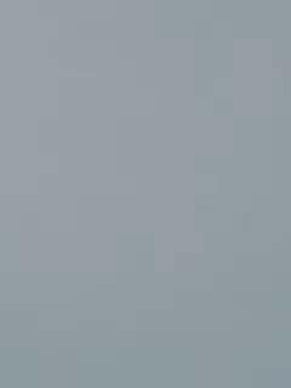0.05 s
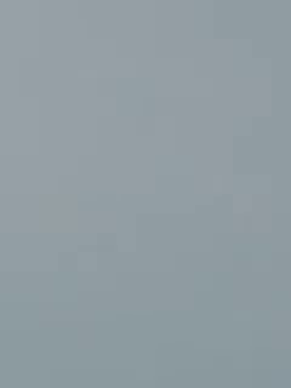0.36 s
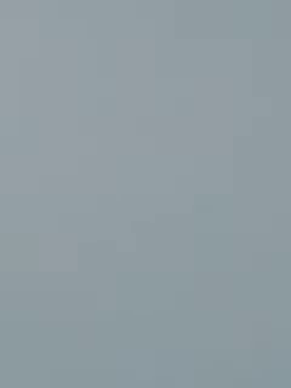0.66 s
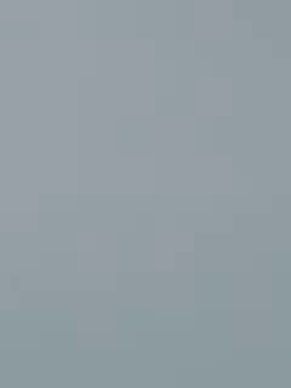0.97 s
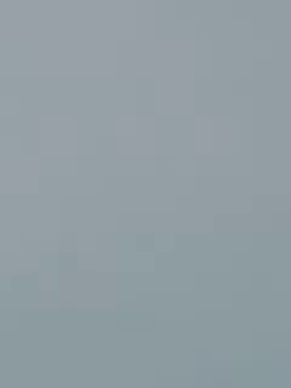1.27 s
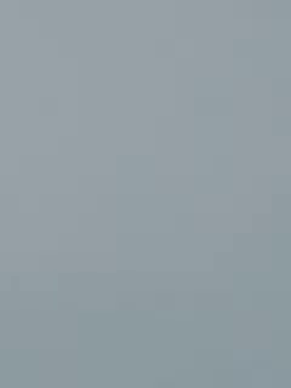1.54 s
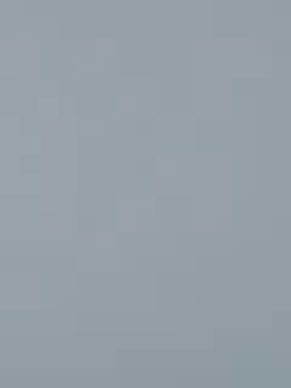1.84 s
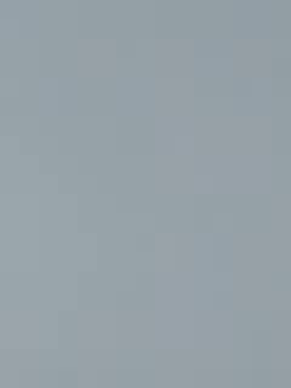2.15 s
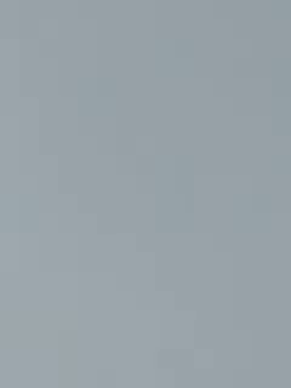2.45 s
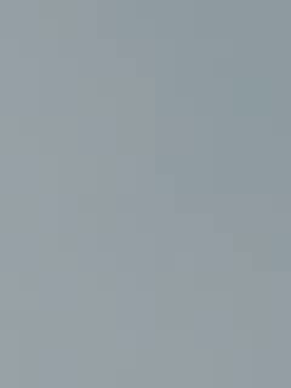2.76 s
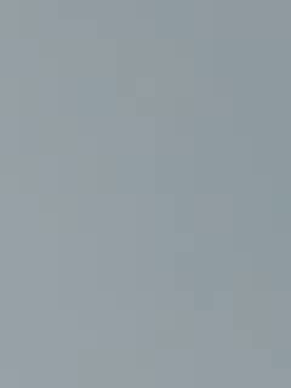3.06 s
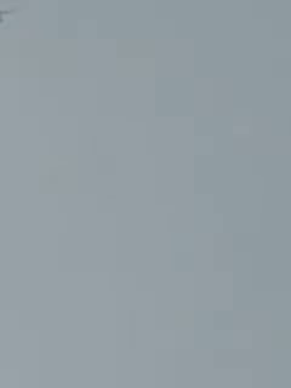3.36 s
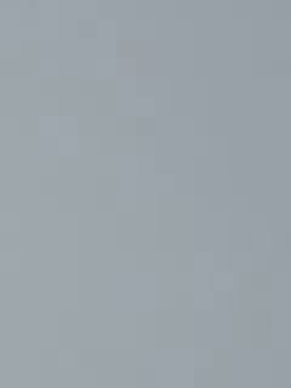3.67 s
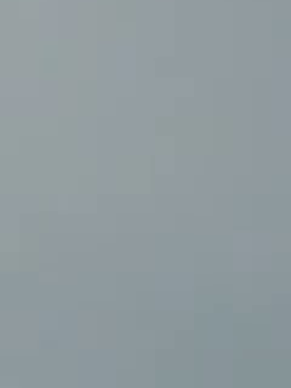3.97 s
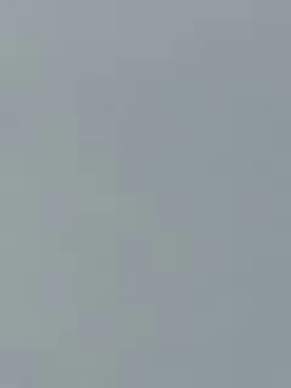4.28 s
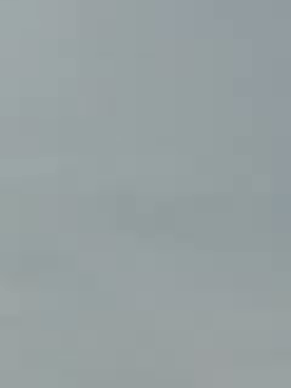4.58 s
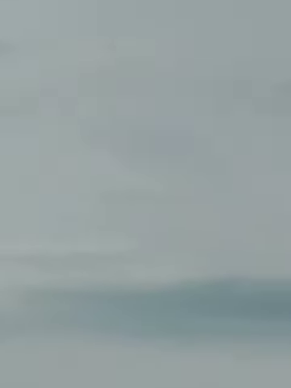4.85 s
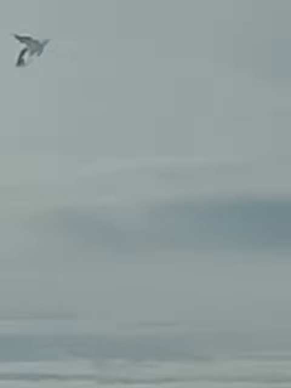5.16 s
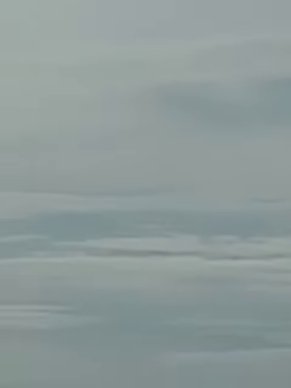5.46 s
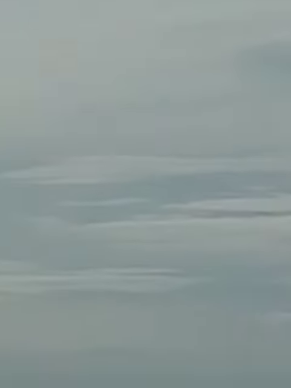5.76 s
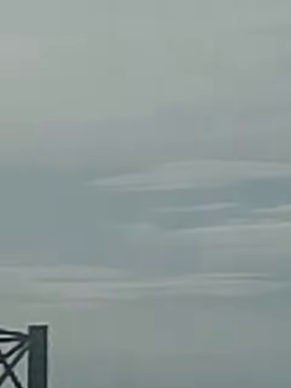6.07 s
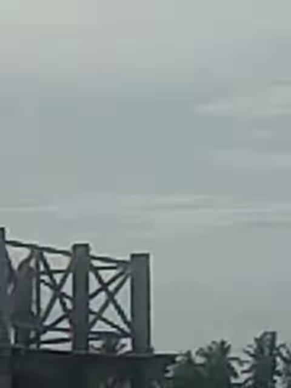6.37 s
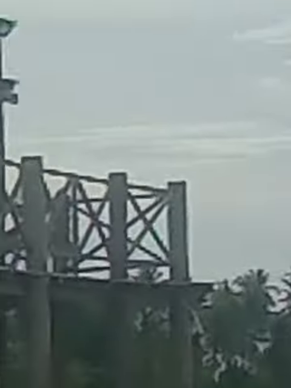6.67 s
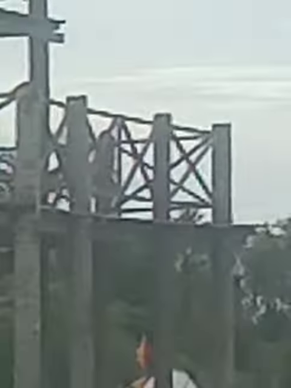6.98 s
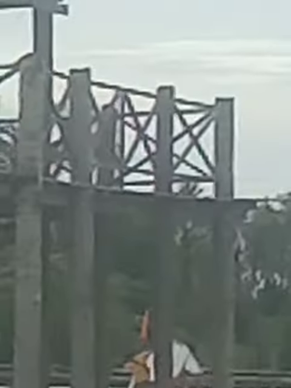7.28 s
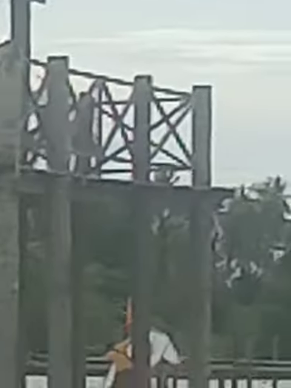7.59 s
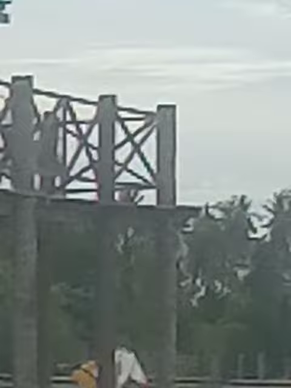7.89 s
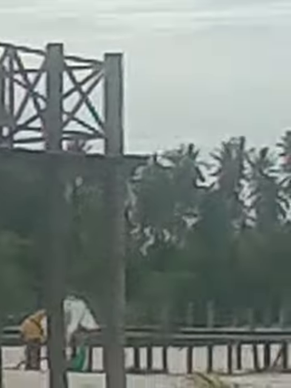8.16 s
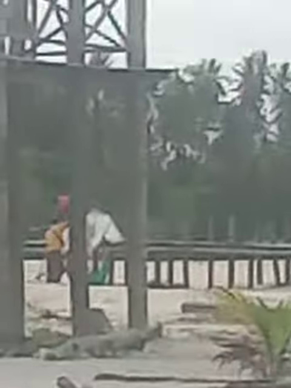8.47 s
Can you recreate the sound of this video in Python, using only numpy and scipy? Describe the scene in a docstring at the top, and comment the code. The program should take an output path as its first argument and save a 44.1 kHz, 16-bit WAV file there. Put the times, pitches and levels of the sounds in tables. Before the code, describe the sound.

A humming kite drones outdoors with a rapid flutter, a faint rasp and a narrow whistle, over the smooth wash of distant surf. Low wind rumble comes and goes on the microphone as the hum swells to its strongest. Then much louder gusts strike in clusters of thumps, briefly pushing down everything else. The hum almost vanishes, returning slightly higher for the last second amid more wind.

```python
"""A humming kite on a beach

The tight ribbon on a kite's bow flutters in the wind and drones, about 28 bursts a second.
The sea hisses behind it, and a hand squeaks faintly on the microphone's casing. Gusts rumble on the
microphone and grow into hard thumps, which make a limiter turn everything down for a moment."""
import sys
import numpy as np
from scipy import signal
from scipy.io import wavfile
from scipy.ndimage import uniform_filter1d, map_coordinates

SR = 44100
rng = np.random.default_rng(int(sys.argv[2]) if len(sys.argv) > 2 else 0)


def output_pcm(signal):
    """Save a mono or channel-first signal as 16-bit PCM at the path in sys.argv[1].

    Samples are clipped to [-1, 1] before scaling.
    """
    pcm = np.clip(np.atleast_2d(signal).T, -1, 1) * 32767
    wavfile.write(sys.argv[1], SR, np.round(pcm).astype(np.int16))


N = 376173
TIME = np.arange(N) / SR

# How fast the ribbon flutters; a pass is one swing. Each row: time in seconds, passes per second.
FLUTTER = [(0, 33.7), (.2, 30.0), (.4, 28.45), (.9, 28.98), (1.8, 28.54), (3.3, 28.05), (4.1, 28.1),
           (4.6, 28.35), (6.8, 28.04), (7.71, 29.3), (8.12, 29.4), (8.25, 32.3), (8.53, 32)]
# Uneven swings. Each row: time in seconds, dB added to the forward swing and taken off the return.
LOPSIDED = [(.6, 0), (1.1, 0.4), (1.7, -0.8), (2.3, -2), (3.3, -0.3), (3.9, -1.44), (4.3, -2), (7.7, 2.5)]
# The ribbon's hum. Each row: time in seconds, pitch at the height of a pass in Hz, level in dB.
HUM = [(0, 757, -44), (.4, 803, -42), (.85, 865, -38.5), (1.15, 793, -40), (1.5, 815, -42.5),
       (2.05, 881, -42), (2.35, 880, -39.5), (2.8, 896, -44.5), (3.45, 950, -52), (3.9, 943, -35.5),
       (4.15, 885, -44), (4.5, 900, -49), (5.1, 907, -45.5), (5.5, 813, -68), (7.55, 906, -61.5),
       (7.72, 1019, -44.5), (8.1, 964, -51.5), (8.53, 878, -48)]
# The ribbon's higher sounds. Each row: time in seconds, overtone level in dB, rasp level in dB.
UPPER_VOICE = [(0, -59, -69), (.7, -60, -71), (1.0, -55, -55.5), (1.35, -56.5, -66), (1.7, -51.5, -75),
               (2.3, -52, -64), (2.8, -57, -69), (3.6, -54, -62), (3.92, -43, -54.5), (4.2, -59, -60.5),
               (4.7, -56, -62.5), (6.5, -81.5, -81), (7.9, -62.5, -57.5), (8.5, -66.5, -66)]
# The bow's narrow whistle. Each row: time in seconds, level in dB, pitch in Hz.
WHISTLE = [(1.9, -53.5, 1263), (2.4, -44, 1233), (3.1, -45, 1270), (3.6, -47, 1318), (4.6, -53.5, 1270),
           (6.8, -53.5, 1244), (8.53, -46.5, 1260)]
# A broad ring below the hum, lasting between passes. Each row: time in seconds, level in dB, pitch in Hz.
GROWL = [(0, -38, 590), (.3, -43, 620), (1.3, -45, 720), (2.0, -50, 720), (3.4, -44.5, 700),
         (3.9, -36.5, 745), (4.3, -38.5, 745), (4.8, -47.5, 750), (5.5, -65.5, 720), (7.4, -56.5, 700),
         (8.0, -46.5, 700), (8.4, -41.5, 710)]
# A thin ring when the wind pulls hardest. Each row: time in seconds, level in dB, pitch in Hz.
SINGING = [(3.5, -75, 946), (3.9, -49, 956), (4.4, -51.5, 939), (4.9, -76, 900)]
# Echoes from the ground and timber frames. Each row: delay in seconds, level in dB.
ECHOES = [(.00633, -20.5), (.015, -12.5), (.047, -19)]
# The tone colour of the sea. Each row: frequency in Hz, relative level in dB.
SEA_SPECTRUM = [(100, -17.5), (400, 1), (900, 0.5), (1170, 7), (1550, 0.5), (2000, 1.5), (2700, -4.5),
                (3400, -20.5), (4300, -22), (5500, -32.5), (7000, -33.5), (12000, -45.5), (15000, -44.5)]
# The slow swell of the sea. Each row: time in seconds, level in dB.
SWELL = [(0, -43), (1.1, -44), (1.6, -46.5), (2.5, -45.5), (3.3, -43), (4.3, -44), (5.1, -46), (5.8, -49.5),
         (6.9, -46), (7.8, -44), (8.25, -43), (8.53, -50.5)]
# Brief rises of the background hiss, imitating the limiter letting go between gusts.
# Each row: time in seconds, rise in dB, half length in seconds.
HISS_RISES = [(4.932, 2.5, .03), (5.66, 6.5, 0.042), (6.162, 5.5, 0.036), (6.514, 5.5, 0.0082),
              (7.453, 4.5, 0.031)]
# Gusts on the microphone. Each row: start in seconds, length in seconds, pressure in dB.
GUSTS = [(0.07, 0.42, -40), (0.242, 0.33, -33.5), (0.727, 0.15, -36), (0.91, 0.042, -28),
         (0.997, 0.35, -34.5), (1.383, 0.3, -32.5), (2.127, 0.21, -32), (2.426, 0.23, -34.5),
         (2.944, 0.035, -35), (3.596, 0.018, -26.5), (3.67, 0.082, -32.5), (3.803, 0.45, -31),
         (4.431, 0.024, -27.5), (4.533, 0.082, -26), (4.702, 0.03, -26.5), (4.804, 0.012, -11),
         (4.951, 0.026, -25.5), (5.072, 0.13, -30), (5.288, 0.026, -12.5), (5.365, 0.1, -15.5),
         (5.512, 0.073, -5.5), (5.579, 0.04, -9), (5.831, 0.12, -21), (6.013, 0.24, -20.5),
         (6.31, 0.2, -18.5), (6.557, 0.082, -14.5), (6.647, 0.068, -26.5), (6.726, 0.39, -35),
         (7.055, 0.36, -18.5), (7.498, 0.16, -15.5), (7.762, 0.57, -23.5), (8.38, 0.17, -23)]
# The wind's basic tone colour. Each row: frequency in Hz, relative level in dB.
RUMBLE_SPECTRUM = [(25, -22), (40, -24.5), (65, -4), (105, 4.5), (150, 0), (220, -7.5), (330, -20.5),
                   (500, -33), (900, -65.5), (1800, -69.5), (4000, -105)]
# Wind straight into the microphone is brighter. Each row: time in seconds, tilt in dB per octave.
FACING = [(0, -1.5), (1.5, -2.5), (2.4, -13.5), (3.9, -15.5), (4.8, -1.5), (7.2, -0.5), (8.0, 0)]
# A hand rubbing the casing. Each row: time in seconds, level in dB, half length in seconds.
SQUEAKS = [(1.98, -62, 0.018), (3.51, -73, .012)]
# Where the casing rings. Each row: pitch in Hz, width in Hz, level in dB.
CASING = [(6940, 240, -2), (14750, 400, -3)]
# Single hard knocks of wind. Each row: time in seconds, strength in dB, width in seconds.
BUFFETS = [(4.792, -1, .0013), (4.823, 6, 0.00056), (5.055, 4, 0.0025), (5.077, 0.5, 0.00058),
           (5.276, 0.5, 0.0016), (5.288, 6.5, 0.00069), (5.299, 1.5, 0.00032), (5.31, 1.5, 0.00055),
           (5.321, 7, 0.00093), (5.367, 2.5, 0.00079), (5.371, 3, 0.003), (5.407, 1, 0.0015),
           (5.416, 2.5, 0.001), (5.446, 5, 0.00081), (5.508, 7.5, 0.00075), (5.516, 7, 0.00053),
           (5.53, 6.5, 0.00083), (5.541, 9.5, 0.00032), (5.539, 6, 0.00083), (5.55, -7.5, 0.0022),
           (5.565, -1.5, .002), (5.585, 5.5, 0.00048), (5.599, 1.5, 0.00082), (5.61, 1.5, 0.0012),
           (5.758, -0.5, 0.0022), (5.845, -17.5, 0.0013), (5.861, -10, 0.0017), (5.913, -3, 0.0015),
           (5.989, -2.5, 0.00089), (6.023, 3.5, 0.0011), (6.055, -3.5, 0.0009), (6.185, -10.5, 0.0013),
           (6.293, -4.5, 0.0017), (6.32, -4.5, 0.00067), (6.347, -3.5, 0.00075), (6.399, 1, 0.00095),
           (6.412, 4, 0.0011), (6.438, 4.5, 0.002), (6.466, -5.5, 0.00084), (6.56, -9, 0.00076),
           (6.62, 0.5, 0.00051), (7.062, -3.5, 0.00073), (7.071, 0.5, 0.00085), (7.102, -4, 0.0021),
           (7.125, -3, 0.0015), (7.151, -2.5, 0.00039), (7.166, 0, 0.0011), (7.21, 1.5, 0.0014),
           (7.246, -13, 0.0008), (7.263, -0.5, 0.00091), (7.302, 0, 0.00097), (7.314, 7, 0.0023),
           (7.379, -6.5, 0.00043), (7.389, -4.5, 0.0014), (7.486, 0, 0.00081), (7.508, -12, 0.00089),
           (7.552, -5, 0.0013), (7.565, 4, 0.0012), (7.582, 2, 0.00091), (7.594, 6, 0.00035),
           (7.627, -6, .002), (7.657, 5, 0.0011), (7.921, -12, 0.00078), (8.148, -0.5, 0.0013),
           (8.214, -2.5, 0.0017), (8.351, 3, 0.0022), (8.41, 0, 0.00098), (8.479, 2, 0.00077)]


def from_db(db):
    """Turn decibels into a number to multiply by."""
    return 10 ** (np.asarray(db) / 20)


def rms_one(x):
    """Scale a signal so that its average level (rms) is 1."""
    return x / np.sqrt(np.mean(x ** 2) + 1e-20)


def in_time(rows):
    """Join a table's rows with straight lines: one curve for each column after the time."""
    times, *columns = np.transpose(rows)
    return [np.interp(TIME, times, column) for column in columns]


def drift(rate):
    """A smooth random wobble of size about 1, changing about rate times a second."""
    r = np.exp(-40 * np.pi * rate / SR)
    slow = signal.lfilter([1], [1, -2 * r, r * r], rng.standard_normal(N // 20 + 2002))[2000:]
    return np.interp(np.arange(N) / 20, np.arange(len(slow)), rms_one(slow))


def filtered(x, order, hz, kind):
    """Keep the "low" part, the "high" part or a "band"; a higher order cuts more steeply."""
    return signal.sosfilt(signal.butter(order, hz, kind, fs=SR, output="sos"), x)


def resonate(x, hz, width_hz):
    """Let a sound ring around one pitch; a narrower width rings longer."""
    r = np.exp(-np.pi * width_hz / SR)
    feedback = [1, -2 * r * np.cos(2 * np.pi * hz / SR), r * r]
    return signal.lfilter(np.array([1, 0, -1]) * (1 - r * r) / 2, feedback, x + 1e-18)


def noise_between(low_hz, high_hz):
    """One band of noise at level 1."""
    return rms_one(filtered(rng.standard_normal(N), 4, [low_hz, high_hz], "band"))


def noise_bands(spectrum):
    """Noise of a given tone colour, as (centre in Hz, sound) bands that add up to about level 1."""
    edges = np.geomspace(22, 17000, 30)
    centres = np.sqrt(edges[1:] * edges[:-1])
    hz, db = np.transpose(spectrum)
    gains = from_db(np.interp(np.log(centres), np.log(hz), db)) * np.sqrt(np.diff(edges))
    gains /= np.linalg.norm(gains)
    white = rng.standard_normal((2, N))
    return [(centre, gains[k] * rms_one(filtered(white[k % 2], 3, edges[k:k + 2], "band")))
            for k, centre in enumerate(centres)]


def ribbon(top_hz, sharpness=2.5, bend=0.2, rise=.045, uneven_db=0.89, pitch_pull=0.23, blur_db=0.57):
    """The ribbon sheds swirls of air. Gives its speed (0 to 1), its bursts and its tone's phase."""
    passes = .42 + np.cumsum(in_time(FLUTTER)[0]) / SR + .012 * drift(8)
    speed = np.cos(np.pi * passes) ** 2
    vigour_db = in_time(LOPSIDED)[0] * np.cos(np.pi * passes) + uneven_db * drift(23)
    burst = speed ** sharpness * from_db(vigour_db)
    # A faster swing sounds higher, and the pitch climbs a little through each pass.
    pitch = top_hz * (1 - bend * (1 - speed ** 2) + rise * np.sin(2 * np.pi * passes))
    pitch *= from_db(pitch_pull * vigour_db + blur_db * drift(130))
    # The tone starts afresh on every pass, so the passes blend into one buzz.
    cycles = np.cumsum(pitch) / SR
    cycles_at_mid_pass = np.interp(np.round(passes), passes, cycles)
    return speed, burst, 2 * np.pi * (cycles - cycles_at_mid_pass)


def bow_ring(table, burst, width_hz, skirt_hz, idle):
    """Rough air from each pass makes the bow ring; idle is the push that stays between passes."""
    level_db, hz = in_time(table)
    push = (rng.standard_normal(N) + 1j * rng.standard_normal(N)) * (idle + burst)
    # Shape the ring around 0 Hz, trim its edges, then move it up to its changing pitch.
    ring = signal.lfilter([1], [1, -np.exp(-np.pi * width_hz / SR)], push)
    ring = filtered(ring, 2, skirt_hz, "low")
    ring *= np.exp(2j * np.pi * np.cumsum(hz) / SR)
    return from_db(level_db) * rms_one(ring.real)


def kite_hum(overtone_ratio=2.09, roughness=0.12, swish_db=-17):
    """Each pass of the ribbon makes a sweeping tone, an overtone, a swish and a rasp, and rings the bow."""
    top_hz, level_db = in_time(HUM)
    overtone_db, rasp_db = in_time(UPPER_VOICE)
    speed, burst, phase = ribbon(top_hz)
    tone = rms_one(burst * (1 + roughness * drift(89)) * np.sin(phase))
    # The overtone only sounds at the height of each pass.
    overtone = burst * speed ** 4 * np.sin(overtone_ratio * phase + .3 * drift(150))
    for _ in range(2):
        overtone = resonate(overtone, hz=1950, width_hz=620)
    rough_air = rng.standard_normal(N) * (.1 + burst)
    swish = resonate(rough_air, hz=1500, width_hz=1500)
    swish = rms_one(filtered(swish, 6, 2150, "low"))
    rasp = rms_one(noise_between(2150, 2900) * (.4 + burst))
    bow = (bow_ring(WHISTLE, burst, width_hz=61, skirt_hz=190, idle=.15)
           + bow_ring(GROWL, burst, width_hz=100, skirt_hz=101, idle=.47)
           + bow_ring(SINGING, burst, width_hz=14, skirt_hz=60, idle=.8))
    hum = from_db(level_db) * (tone + from_db(swish_db) * swish)
    return hum + from_db(overtone_db) * rms_one(overtone) + from_db(rasp_db) * rasp + bow


def outdoor_echoes(x):
    """The sound arrives directly, then again, later and softer, from nearby surfaces."""
    return x + sum(from_db(db) * np.interp(TIME - delay, TIME, x, left=0) for delay, db in ECHOES)


def sea(level_db=-2):
    """Distant surf: a smooth wash that swells and slowly shifts in colour."""
    wash = sum(band * from_db(1.1 * drift(2) + .9 * drift(20)) for _, band in noise_bands(SEA_SPECTRUM))
    rise_db = sum(db * np.exp(-((TIME - at) / half_s) ** 2) for at, db, half_s in HISS_RISES)
    return wash * from_db(in_time(SWELL)[0] + rise_db + level_db)


def near_reflection(x, delay_s=.0019, wander=.16, strength=.28):
    """A close echo weakens some pitches; they shift as the moving microphone changes its delay."""
    delay = delay_s * np.exp(wander * drift(1.2))
    return x + strength * map_coordinates(x, [(TIME - delay) * SR], order=3)


def gust_pressure(attack_s=0.017, release_s=0.031, breeze_db=-45):
    """Wind pressure in dB: each gust builds quickly, holds and dies away over a light breeze."""
    power = from_db(breeze_db) ** 2
    for start, length, db in GUSTS:
        rise = np.maximum(start - TIME, 0) / attack_s
        fall = np.maximum(TIME - start - length, 0) / release_s
        power += (from_db(db) * np.exp(-np.minimum(rise ** 2 + fall, 20))) ** 2
    return 10 * np.log10(power)


def wind(level_db=1.5, lumpy_db=3, calm_db=-30, brighten=0.32, knee_hz=150):
    """Swirls of air hit the microphone in lumps; harder gusts bring smaller swirls that sound brighter."""
    pressure_db = gust_pressure() + level_db + lumpy_db * drift(18)
    above_calm_db = np.maximum(pressure_db - calm_db, 0)
    db_per_octave = np.minimum(in_time(FACING)[0] + brighten * above_calm_db + 3 * drift(90), 10)
    rumble = np.zeros(N)
    for hz, band in noise_bands(RUMBLE_SPECTRUM):
        octaves_up = np.clip(np.log2(hz / knee_hz), 0, 2.5)
        rumble += band * from_db(db_per_octave * octaves_up)
    return from_db(pressure_db) * rumble


def hand_squeaks():
    """Short rubs of a hand make the casing ring."""
    rub = sum(from_db(db) * np.exp(-((TIME - at) / half_s) ** 2) for at, db, half_s in SQUEAKS)
    ring = sum(from_db(db) * rms_one(resonate(rng.standard_normal(N), hz, width))
               for hz, width, db in CASING)
    return rub * ring


def wind_thumps(level_db=-6, wake_db=-7, wake_s=0.00587):
    """A hard swirl pushes and pulls at the microphone's opening; a weaker, slower one follows."""
    pressure = np.zeros(N)
    for time, db, width in BUFFETS:
        lateness, coin = rng.random(2)
        strength = from_db(db + level_db) * np.sign(coin - .5)  # push first or pull first
        wake_time = time + wake_s * (.5 + lateness)
        for at, spread, gain in ((time, width, 1), (wake_time, 2 * width, from_db(wake_db))):
            near = slice(*np.searchsorted(TIME, [at - 6 * spread, at + 6 * spread]))
            offset = (TIME[near] - at) / spread
            pressure[near] += gain * strength * 2 * offset * np.exp(-offset ** 2)
    thumps = resonate(pressure, hz=220, width_hz=420)
    return thumps + wind_crackle(thumps) + recorder_fizz(thumps)


def wind_crackle(thumps, level_db=-10, smear_s=0.011):
    """Small swirls crackle around the sharpest thumps."""
    sharp = filtered(thumps, 4, 480, "high")
    strength = np.sqrt(np.abs(uniform_filter1d(sharp ** 2, int(smear_s * SR))))
    return from_db(level_db) * strength * noise_between(350, 900)


def recorder_fizz(thumps, level_db=-56):
    """A faint 12 kHz recorder fizz on the loudest thumps."""
    return from_db(level_db) * thumps ** 2 * noise_between(11750, 12350)


def limiter(x, ceiling_db=-18.5, release_db_per_s=190, window_s=0.0092, attack_s=0.0075):
    """Turn the volume down quickly when the level passes the ceiling, then steadily back up."""
    power = np.abs(uniform_filter1d(x[0] ** 2, int(window_s * SR)))
    over_db = np.maximum(10 * np.log10(power + 1e-12) - ceiling_db, 0)
    recovery = release_db_per_s * TIME
    held_db = np.maximum.accumulate(over_db + recovery) - recovery
    smoothing = np.exp(-1 / (attack_s * SR))
    cut_db = signal.lfilter([1 - smoothing], [1, -smoothing], held_db)
    return x * from_db(-cut_db)


def scene():
    """Kite and sea far away, wind and hand at the microphone, all in one channel."""
    far = outdoor_echoes(kite_hum()) + near_reflection(sea())
    return (far + wind() + wind_thumps() + hand_squeaks())[None, :]


def record(dry, low_cut_hz=52, high_cut_hz=15600, hiss_db=-82):
    """Cut the deepest rumble, hold down the gusts, add a faint hiss and cut the highest treble."""
    trimmed = filtered(dry, 2, low_cut_hz, "high")
    levelled = limiter(trimmed) + from_db(hiss_db) * rng.standard_normal(N)
    fade_out = np.clip((TIME[-1] - TIME) / .002, 0, 1)
    high_cut = signal.ellip(10, .1, 80, high_cut_hz, fs=SR, output="sos")
    return signal.sosfilt(high_cut, fade_out * levelled)


dry = scene()
out = record(dry)
output_pcm(out)
```